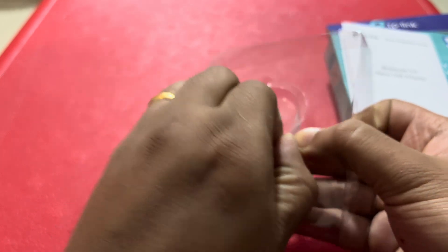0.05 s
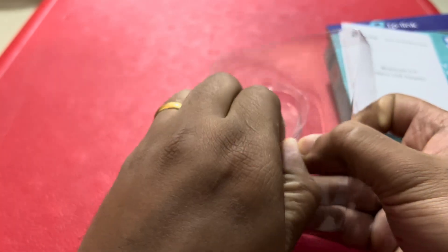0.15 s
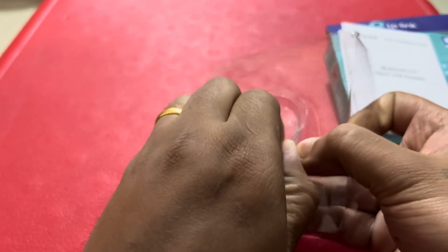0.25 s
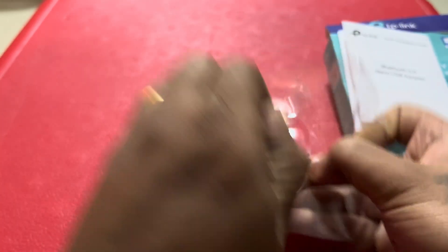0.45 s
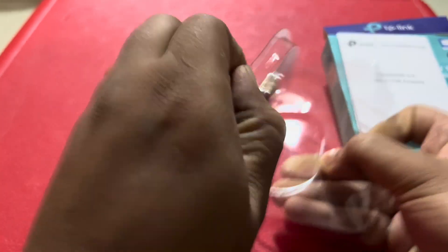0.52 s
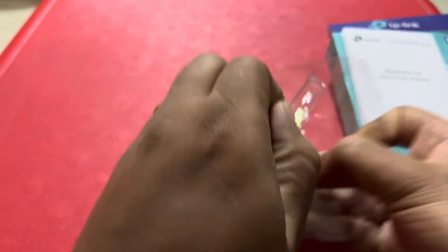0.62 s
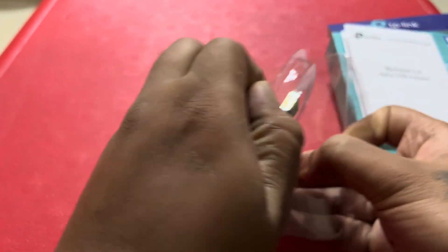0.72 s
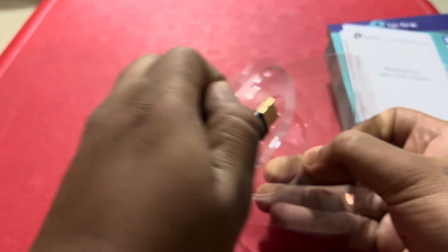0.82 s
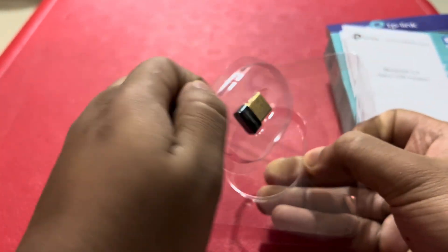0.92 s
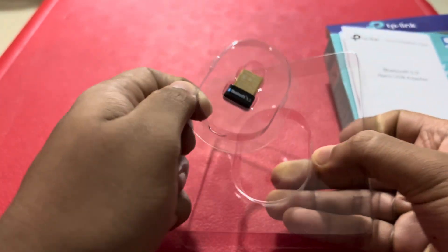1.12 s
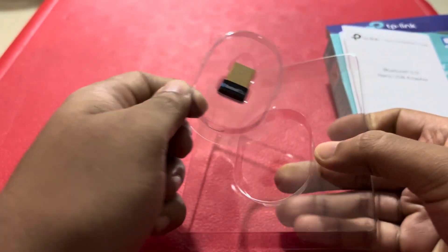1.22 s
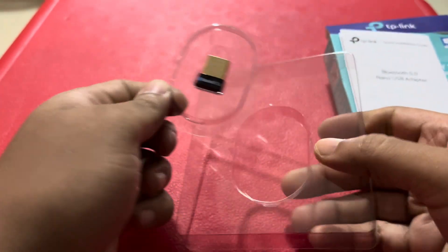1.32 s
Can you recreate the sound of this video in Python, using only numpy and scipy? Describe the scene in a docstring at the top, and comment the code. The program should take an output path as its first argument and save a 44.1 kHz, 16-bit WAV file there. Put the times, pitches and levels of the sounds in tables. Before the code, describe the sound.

Thin clear plastic packaging snaps open in a sharp crackling burst, then faint rubbing and ticks

```python
"""A thin plastic cover is pulled off a clear tray by two hands, close by in a small live room.
The sheet ticks under strain, snaps loudly in a quick run, then rubs with faint ticks and scrapes.
Snaps are noise bursts with short ringing tones; rubbing and crinkling are many tiny random clicks.
Soft thumps are fading sine waves. Noise shaped by a spectrum makes the handling and the room rumble,
a decaying noise tail makes the echo, and two sine waves add a faint hum."""
import sys
import numpy as np
from scipy import signal
from scipy.fft import rfft, irfft, next_fast_len
from scipy.io import wavfile

SR = 44100
rng = np.random.default_rng(int(sys.argv[2]) if len(sys.argv) > 2 else 0)


def persist_wave(psi):
    """Save psi, clipped to +-1, as 16-bit WAV."""
    counts = np.round(np.clip(psi, -1, 1) * 32767).astype(np.int16)
    wavfile.write(sys.argv[1], SR, np.atleast_2d(counts).T)


N = 59535
TIME = np.arange(N) / SR

# Faint hum in the room: (frequency [Hz], level [dB])
HUM = [(48.5, -50), (97, -51)]
# Spectrum shape of the room rumble: (frequency [Hz], density [dB per Hz])
RUMBLE_SPECTRUM = [(20, -23), (33, -12), (50, -3.5), (95, -4.5), (160, -5.5), (300, -4.5), (460, -9),
                   (650, -22), (1300, -24.5), (2500, -47.5), (5000, -52.5), (8000, -62), (16000, -65)]
# Side against middle for diffuse sound: (frequency [Hz], level [dB])
STEREO_WIDTH = [(30, -25), (120, -16.5), (300, -11.5), (1000, 1), (4000, -1), (12000, 3.5)]
# Tone of the room's echo: (frequency [Hz], level [dB])
ROOM_COLOUR = [(100, -12), (500, 2), (1300, -7.5), (2500, -10), (3800, -5), (5200, -4), (8000, -6.5),
               (12000, -8), (16000, -3)]
# Low noise of the moving hands: (time [s], level [dB])
HANDLING_LEVEL = [(0, -49.5), (.15, -55.5), (.38, -66), (.45, -39.5), (.54, -37.5), (.60, -47.5),
                  (.70, -50), (.84, -53.5), (1.0, -61), (1.2, -59.5), (1.3, -54)]
# Spectrum shape of that noise: (frequency [Hz], density [dB per Hz])
HANDLING_SPECTRUM = [(25, 1.5), (60, 5), (130, -1.5), (300, -7), (480, -4.5), (650, -16.5), (1500, -28.5),
                     (4000, -59)]
# Sliding of sheet on sheet and skin: (time [s], level [dB])
RUB_LEVEL = [(0, -64), (.1, -66), (0.378, -61), (0.438, -24), (.475, -36), (0.497, -26), (0.522, -48.5),
             (.6, -46.5), (0.713, -66.5), (.724, -48.5), (0.766, -44.5), (.805, -53), (.84, -66),
             (.93, -72.5), (.96, -56), (1.04, -57), (1.11, -62.5), (1.18, -59), (1.280, -56),
             (1.293, -47.5), (1.35, -53)]
# Spectrum shape of the sliding: (frequency [Hz], density [dB per Hz])
RUB_SPECTRUM = [(200, -6), (500, -6.5), (800, -7), (1050, 1.5), (1300, 7.5), (1800, -7), (2250, -2),
                (3200, -13.5), (4000, -19), (6500, -30), (8300, -48), (11000, -27), (16000, -37)]
# Fine bright crinkling of the bent sheet: (time [s], level [dB])
CRINKLE_LEVEL = [(0, -70), (.39, -71), (0.403, -31), (0.432, -59), (0.441, -29), (0.469, -48.5),
                 (0.551, -64), (0.599, -50), (.64, -54), (.70, -72.5), (0.759, -62), (.85, -105.5),
                 (1.05, -81.5), (1.15, -71), (1.25, -70), (1.30, -56), (1.35, -71)]
# Soft flaps and knocks of tray and hands: (time [s], level [dB], pitch [Hz], 60 dB decay [s])
THUMPS = [(.427, -6, 716, 0.013), (0.435, -20, 90, 0.099), (0.461, -18, 381, 0.025), (0.473, -14, 76, 0.12),
          (0.478, -29.5, 136, 0.24), (.530, -17.5, 76.4, 0.11), (.535, -33, 437, 0.059),
          (0.542, -16, 137, 0.036), (0.661, -20.5, 190.4, 0.039), (0.663, -29, 282, .1),
          (0.671, -33.5, 99.5, 0.12), (0.786, -28, 108.7, 0.11), (0.818, -39, 65, 0.22),
          (0.897, -27.5, 110.2, 0.099)]
# Ringing modes of the thin panel, before its low cut:
# (frequency at pitch ratio 1 [Hz], level [dB], 60 dB decay [s])
PANEL_MODES = [(1125, -0.5, 0.013), (1433, 2.5, 0.0071), (1765, -10, 0.012), (2430, -23, 0.0065),
               (2910, -11.5, 0.0048)]
# The strained dome gives a little, then cracks:
# (time [s], pop level [dB], pitch ratio [1], delay of the crack [s], crack level [dB])
STRAINS = [(0.1235, -25.5, 0.98, 0.0017, -20.5), (0.1527, -21.5, 0.98, 0.0013, -23),
           (0.2265, -14, 1.058, 0.0003, -15)]
# Spectrum shape of the strain cracks: (frequency [Hz], density [dB per Hz])
STRAIN_SPECTRUM = [(300, -27.5), (850, -21.5), (1150, -9), (1650, 4.5), (2000, 0.5), (2350, 6.5), (2900, 0),
                   (3200, -10.5), (3750, 2), (4300, -7.5), (5300, 1.5), (6700, 0.5), (8300, -20.5),
                   (9700, 3), (11400, -2), (13000, -10.5), (16000, -23.5)]
# The sheet buckles:
# (time [s], crack level [dB], pop level [dB], pitch ratio [1], brightness [dB per octave])
SNAPS = [(0.3907, -7, -14.5, 1.05, -2), (0.4027, -25.5, -20, 1.3, 8), (0.4053, -22, -26, 1.12, 5),
         (0.4116, -19.5, -32.5, 1.46, -14), (0.414, -28, -42, 1.1, -12.5), (.4262, -9.5, 0.5, 1.043, 1),
         (0.4294, -40.5, -10.5, 1.12, -6.5), (0.4382, -13, -19, 0.69, -7), (0.4426, -14, -29, 1.2, -3.5),
         (0.4458, -18, -23, 1.4, 4), (0.4583, -14, -12.5, 1.03, -6), (0.465, -24, -28, 1.3, -15),
         (0.4899, -26, -28, .85, -3.5), (0.495, -21.5, -40, .85, -4.5), (0.503, -15.5, -18.5, 0.816, -9.5),
         (.5840, -17, -27, 1.3, 0.5), (0.589, -24, -21, 0.987, 4)]
# Spectrum shape of snaps and crinkles, before any tilt: (frequency [Hz], density [dB per Hz])
CRACK_SPECTRUM = [(300, -21.5), (800, -16), (1300, 7), (2000, 1.5), (2400, -1), (3300, 0), (3800, 2),
                  (4800, 0.5), (6600, 0), (8300, -17.5), (9800, -3.5), (11200, -3), (13000, -9.5),
                  (16000, -25.5)]
# Faint ticks of the relaxing sheet: (time [s], level [dB], brightness [dB per octave])
TICKS = [(0.0393, -45, 2.5), (1.086, -38.5, -4.5), (1.1764, -38.5, -7), (1.1927, -43.5, -4),
         (1.205, -41.5, -5.5), (1.226, -52, 3), (1.238, -51, -4), (1.253, -50, -7), (1.2700, -27.5, -2.5),
         (1.291, -41, -11), (1.301, -43, 5)]
# Spectrum shape of the ticks, before any tilt: (frequency [Hz], density [dB per Hz])
TICK_SPECTRUM = [(500, -14), (1200, 2), (2100, -3.5), (3000, 7), (3800, 5.5), (5000, -6), (7000, -2),
                 (8300, -20.5), (10500, 1), (13500, -9), (16000, -16)]
# Rim catches and scrapes: (time [s], level [dB])
SCRAPES = [(0.6164, -27.5), (0.6311, -32)]
# Spectrum shape of the scrapes: (frequency [Hz], density [dB per Hz])
SCRAPE_SPECTRUM = [(500, -13.5), (2800, -13), (3400, -13.5), (3800, 3), (4250, -8), (4650, -9), (5350, 7),
                   (5900, -3), (6500, -9), (8400, -18), (11000, -12), (13500, -8), (16000, -26)]

RUMBLE_DB = -48.5
ROOM_DB, ROOM_T60_S, ROOM_TREBLE_T60_S = -6.5, 0.49, 0.28
ROOM_SPLIT_HZ, ROOM_BUILD_S = 4200, 0.0093
WALL_DELAY_S, WALL_T60_S, WALL_DB = 0.0085, 0.06, 8  # a cluster of early wall reflections
RUB_GRAINS_PER_S, RUB_GRAIN_SPREAD_DB = 2200, 2.5
CRINKLES_PER_S, CRINKLE_SPREAD_DB = 1500, 2.5
FLUTTER_DB, FLUTTER_S = 2, 0.0044  # the grip catches and gives
THUMP_RISE_CYCLES = 0.32
PANEL_LOW_HZ = 810  # the small panel radiates little below this
POP_DELAY_S = 0.00043
CRACK_RISE_S, CRACK_T60_S, SCRAPE_T60_S = 0.00037, 0.009, 0.026
# Left is raised by this many dB and right is lowered by as many
CRACK_PAN_DB, POP_PAN_DB, THUMP_PAN_DB, RUMBLE_PAN_DB = -0.1, 1.8, 1, 0.8
CRACK_SIDE_DB, RUB_SIDE_DB = -5, -8
LEFT_LEAD_S = 0.00002
PEAK_LIMIT, LOW_CUT_HZ, CUTOFF_HZ = 0.85, 25, 16300


def from_db(db):
    """Turn decibels into gain."""
    return 10 ** (np.asarray(db) / 20)


def rms_one(x):
    """Scale to an rms (average strength) of one."""
    return x / np.sqrt(np.mean(x ** 2) + 1e-20)


def pan(db):
    """Gains for left and right."""
    return from_db([[db], [-db]])


def level_curve(points):
    """Read a level in dB at every sample, along straight lines between points."""
    return np.interp(TIME, *np.transpose(points))


def butterworth(x, hz, kind):
    """Gentle low-pass or high-pass filter."""
    return signal.sosfilt(signal.butter(2, hz, kind, fs=SR, output="sos"), x)


def colour(x, points, tilt=0, keep_power=True):
    """Filter to a spectrum, tilted in dB per octave, with nothing sounding before its cause."""
    size = next_fast_len(2 * N)
    octave = np.log2(np.maximum(np.fft.rfftfreq(2 * size, 1 / SR), 1))
    hz, db = np.transpose(points)
    shape_db = np.interp(octave, np.log2(hz), db)
    tilt_db = tilt * np.maximum(octave, np.log2(hz[0]))
    gain = from_db(shape_db + tilt_db)
    if keep_power:
        gain = rms_one(gain)
    # Folding the cepstrum gives the minimum-phase filter with this gain
    cepstrum = irfft(np.log(gain))[:size]
    cepstrum[1:] *= 2
    response = np.exp(rfft(cepstrum, 2 * size))
    return irfft(rfft(x, 2 * size) * response)[..., :N]


def spread(pair, side_db):
    """Use two unrelated signals as the middle and side of a stereo pair."""
    middle, side = pair
    return rms_one(middle + from_db(side_db) * side * [[1], [-1]])


def diffuse_noise():
    """Stereo noise, alike in the bass and unrelated in the treble."""
    middle, side = rng.standard_normal((2, N))
    return middle + colour(side, STEREO_WIDTH, keep_power=False) * [[1], [-1]]


def age(start_s):
    """Time since an event, zero before it."""
    return np.maximum(TIME - start_s, 0)


def envelope(start_s, rise_s, t60):
    """Quick rise and exponential decay, falling 60 dB in t60 seconds."""
    rise = 1 - np.exp(-(age(start_s) / rise_s) ** 2)
    return rise * from_db(-60 * age(start_s) / t60)


def rumble():
    """Steady low background noise of the room with a faint hum."""
    hum = sum(from_db(db) * np.sin(2 * np.pi * (hz * TIME + rng.random())) for hz, db in HUM)
    noise = rms_one(colour(diffuse_noise(), RUMBLE_SPECTRUM))
    return (from_db(RUMBLE_DB) * noise + hum) * pan(RUMBLE_PAN_DB)


def room(x):
    """Early wall reflections and a diffuse echo whose treble dies sooner."""
    noise = diffuse_noise()
    low = butterworth(noise, ROOM_SPLIT_HZ, "low")
    high = butterworth(noise, ROOM_SPLIT_HZ, "high")
    low_tail = low * envelope(0, ROOM_BUILD_S, ROOM_T60_S)
    high_tail = high * envelope(0, ROOM_BUILD_S, ROOM_TREBLE_T60_S)
    walls = from_db(WALL_DB) * envelope(WALL_DELAY_S, ROOM_BUILD_S, WALL_T60_S)
    tail = (low_tail - high_tail) * (1 + walls)
    tail = colour(rms_one(tail) / np.sqrt(N), ROOM_COLOUR, keep_power=False)
    mono = x.mean(axis=0)[None]
    return from_db(ROOM_DB) * signal.fftconvolve(mono, tail, axes=1)[:, :N]


def handling():
    """The hands shift their grip and shake the tray, heard as low noise."""
    noise = rms_one(colour(diffuse_noise(), HANDLING_SPECTRUM))
    return from_db(level_curve(HANDLING_LEVEL)) * noise


def flutter_db():
    """Quick random swings of friction."""
    knots = rng.standard_normal(N)
    return FLUTTER_DB * np.interp(TIME / FLUTTER_S, np.arange(N), knots)


def grains(per_s, spread_db, level, spectrum):
    """Many tiny catches and slips sounding through the sheet."""
    size_db = spread_db * np.minimum(rng.exponential(1, (2, N)), 4)
    sizes = from_db(size_db) * rng.choice([-1, 1], (2, N))
    slips = sizes * (rng.random((2, N)) < per_s / SR)
    loudness = from_db(level_curve(level) + flutter_db())
    return colour(spread(slips, RUB_SIDE_DB) * loudness, spectrum)


def rubbing():
    """Dull sliding of the surfaces and bright crinkling of the bent sheet."""
    sliding = grains(RUB_GRAINS_PER_S, RUB_GRAIN_SPREAD_DB, RUB_LEVEL, RUB_SPECTRUM)
    crinkling = grains(CRINKLES_PER_S, CRINKLE_SPREAD_DB, CRINKLE_LEVEL, CRACK_SPECTRUM)
    return sliding + crinkling


def thumps():
    """Heavily damped swings of the whole tray, as fading sine waves."""
    total = np.zeros(N)
    for start_s, db, hz, t60 in THUMPS:
        swing = np.sin(2 * np.pi * hz * age(start_s))
        total += from_db(db) * envelope(start_s, THUMP_RISE_CYCLES / hz, t60) * swing
    return pan(THUMP_PAN_DB) * total


def crack(start_s, db, tilt, spectrum, t60):
    """A crease runs through the sheet in a burst of tiny slips, made from noise."""
    noise = spread(rng.standard_normal((2, N)), CRACK_SIDE_DB)
    burst = noise * envelope(start_s, CRACK_RISE_S, t60)
    return from_db(db) * colour(burst, spectrum, tilt) * pan(CRACK_PAN_DB)


def pop(start_s, db, ratio):
    """The panel flips over and its modes ring briefly."""
    ringing = np.zeros(N)
    for k, (hz, level, t60) in enumerate(PANEL_MODES):
        fade = from_db(level - 60 * age(start_s) / t60)
        # Neighbouring modes start in opposite directions
        ringing += (-1) ** k * fade * np.sin(2 * np.pi * hz * ratio * age(start_s))
    return from_db(db) * butterworth(ringing, PANEL_LOW_HZ, "high") * pan(POP_PAN_DB)


def sheet():
    """Strain clicks and snaps are a crack with a pop, ticks a crack alone, scrapes a longer burst."""
    total = np.zeros((2, N))
    for start_s, pop_db, ratio, delay, crack_db in STRAINS:
        total += pop(start_s, pop_db, ratio)
        total += crack(start_s + delay, crack_db, 0, STRAIN_SPECTRUM, CRACK_T60_S)
    for start_s, crack_db, pop_db, ratio, tilt in SNAPS:
        total += crack(start_s, crack_db, tilt, CRACK_SPECTRUM, CRACK_T60_S)
        total += pop(start_s + POP_DELAY_S, pop_db, ratio)
    for start_s, db, tilt in TICKS:
        total += crack(start_s, db, tilt, TICK_SPECTRUM, CRACK_T60_S)
    for start_s, db in SCRAPES:
        total += crack(start_s, db, 0, SCRAPE_SPECTRUM, SCRAPE_T60_S)
    return total


def scene():
    """The tray, slightly to the left, with its room and the background."""
    left, right = sheet() + thumps() + rubbing()
    late_right = np.interp(TIME - LEFT_LEAD_S, TIME, right)
    tray = np.array([left, late_right])
    return tray + room(tray) + rumble() + handling()


def record(dry):
    """Round off the loud peaks, then cut the deepest bass and the top of the spectrum."""
    rounded = PEAK_LIMIT * np.tanh(dry / PEAK_LIMIT)
    thinned = butterworth(rounded, LOW_CUT_HZ, "high")
    return signal.sosfilt(signal.ellip(10, 0.1, 80, CUTOFF_HZ, fs=SR, output="sos"), thinned)


dry = scene()
out = record(dry)
persist_wave(out)
```